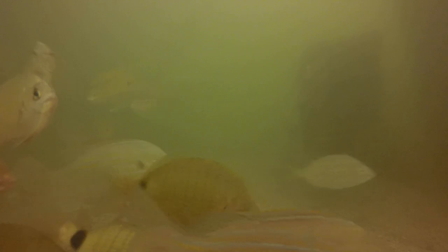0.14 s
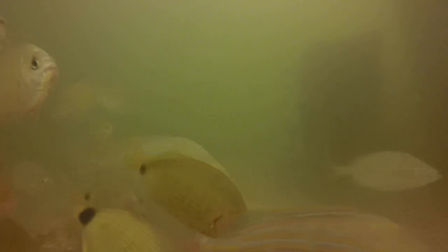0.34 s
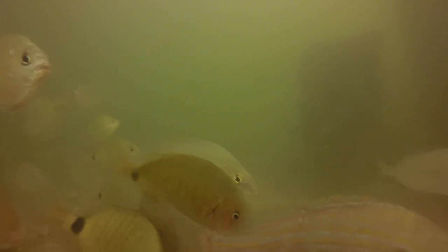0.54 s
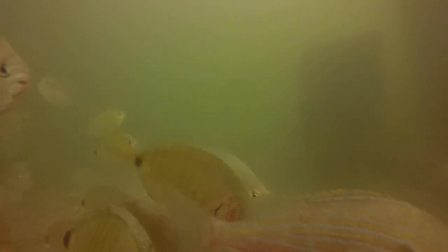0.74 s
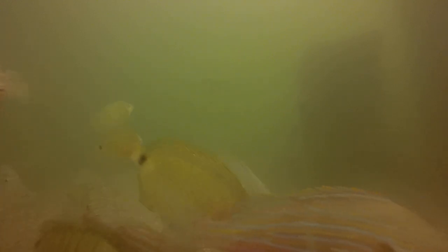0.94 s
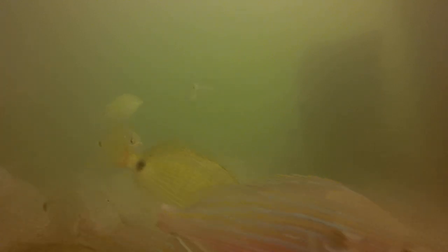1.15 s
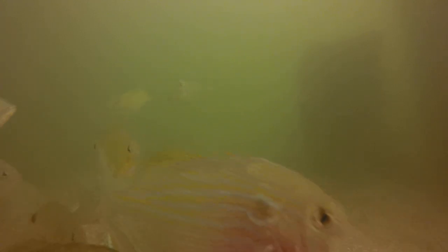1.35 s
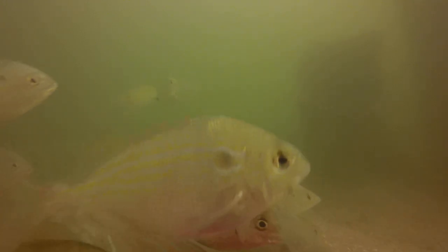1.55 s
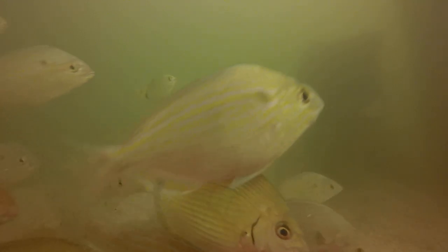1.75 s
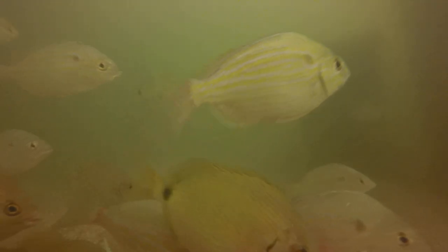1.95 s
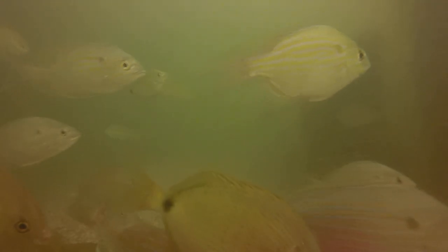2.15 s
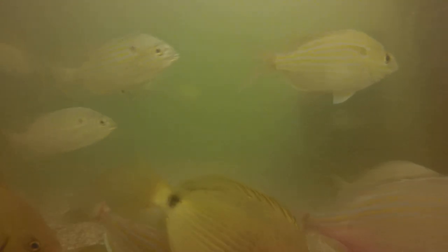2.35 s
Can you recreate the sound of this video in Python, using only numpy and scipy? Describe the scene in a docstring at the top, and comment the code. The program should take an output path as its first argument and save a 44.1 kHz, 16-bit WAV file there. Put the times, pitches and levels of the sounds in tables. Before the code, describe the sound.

Snapping shrimp crackle throughout, sharp nearby ticks over a dense fine distant crackle, thin and resonant inside a sealed underwater housing. Faint water rumbles below. Soft low thumps come early, strongest near 0.3 s, and a double-bump knock at 0.8 s. A deep hum near 50 Hz swells from 1 s, wavers until 1.8 s, then fades by 2 s. Small dull knocks surround it; one bubble blips at 2.2 s.

```python
"""Snapping shrimp beside a pier

Shallow water is heard from inside a sealed camera housing. Shrimp snaps are clicks and echoes that ring
the modes of the housing. A deep hum, a tone with half-order partials and noise, swells and fades over
the rumble of moving water, made of coloured noise, and a faint drone. Soft thumps are smooth pressure
pulses, one knock rings the modes of the mount, and dull small knocks and one bubble are short decaying
tones that rise slightly."""
import sys
import numpy as np
from scipy import signal
from scipy.fft import rfft, irfft
from scipy.io import wavfile

SR = 44100
rng = np.random.default_rng(int(sys.argv[2]) if len(sys.argv) > 2 else 0)


def transcribe(u):
    """Save the signal u as a 16-bit wav file named by the first command-line argument.

    u: samples, shape (n,) or (channels, n), limited to [-1, 1]; the rate is SR.
    q: integer samples, one column per channel.
    """
    v = np.clip(np.atleast_2d(u).T, -1, 1)
    q = np.round(v * 32767).astype(np.int16)
    wavfile.write(sys.argv[1], SR, q)


N = 105840
TIME = np.arange(N) / SR


def from_db(db):
    """Level: an amplitude ratio is ten to the power of a twentieth of its decibels."""
    return 10 ** (np.asarray(db) / 20)


def rms_one(x):
    """Normalisation: division by the root mean square leaves unit rms."""
    return x / np.sqrt(np.mean(x ** 2) + 1e-20)


def in_time(rows):
    """Linear interpolation: a (t/s, value) curve is read at every sample."""
    return np.interp(TIME, *np.transpose(rows))


def at_hz(points, hz):
    """Logarithmic frequency: (f/Hz, value) points are joined by lines on a log axis."""
    f, value = np.transpose(points)
    return np.interp(np.log(hz + 1e-6), np.log(f), value)


def band_pass(x, edges_hz):
    """Band limiting: a Butterworth filter keeps the range between two edges."""
    return signal.sosfilt(signal.butter(2, edges_hz, "band", fs=SR, output="sos"), x)


def noise(spectrum):
    """Spectral shaping: white noise is coloured, falls away outside the range, and is set to unit rms."""
    hz = np.arange(N // 2 + 1) * SR / N
    low_edge = hz ** 2 / (hz ** 2 + spectrum[0][0] ** 2 / 2)
    high_edge = 1 + (hz / (2 * spectrum[-1][0])) ** 2
    white = rfft(rng.standard_normal(N))
    return rms_one(irfft(white * from_db(at_hz(spectrum, hz)) * low_edge / high_edge, N))


def dying_noise(decay_s, size):
    """Reverberation: a dense cloud of echoes decays exponentially; unit energy."""
    cloud = rng.standard_normal(size) * np.exp(-np.arange(size) / (decay_s * SR))
    return cloud / np.linalg.norm(cloud)


def ring(force, hz, t60):
    """Damped resonator: a unit click starts a decaying sine of initial height about 1."""
    radius = from_db(-60 / (t60 * SR))
    angle = 2 * np.pi * hz / SR
    feedback = [1, -2 * radius * np.cos(angle), radius * radius]
    return signal.lfilter([0, np.sin(angle)], feedback, force + 1e-18)


def add(out, sound, s):
    """Superposition: a sound is added to the mix from a given time."""
    start = int(s * SR)
    out[start:start + len(sound)] += sound[:N - start]


# gain of the added favoured resonance, and its width
OWN_RING_DB, OWN_RING_WIDTH_HZ = 4.5, 350


def own_ring(x, hz):
    """Selective resonance: each direction of arrival favours one resonance."""
    peak = signal.iirpeak(hz, hz / OWN_RING_WIDTH_HZ, fs=SR)
    return x + from_db(OWN_RING_DB) * signal.lfilter(*peak, x)


# modes of the housing, before its band limit: f/Hz, level/dB, t60/s
HOUSING_MODES = [(1586, -7.5, 0.031), (1943, -6, 0.026), (2305, 3.5, 0.0071), (2770, -4.5, 0.015),
                 (2930, -9, 0.028), (3613, 0.5, 0.0089), (4270, -6.5, 0.0093), (5202, -2, 0.0081),
                 (6200, 1.5, 0.0027), (7500, 4.5, 0.0021), (10370, 5.5, 0.001), (13200, -9.5, 0.0049),
                 (790, -30, 0.041)]
SHELL_LEAK_DB = -16.5  # pressure change that passes straight through the shell
SHELL_BAND_HZ = (1500, 14400)


def housing(force, colour):
    """Modal superposition: pressure rings modes weighted by colour; little bass or top treble passes."""
    modes = np.zeros(len(force))
    for k, (hz, db, t60) in enumerate(HOUSING_MODES):
        sign = (-1) ** k
        modes += sign * from_db(db + at_hz(colour, hz)) * ring(force, hz, t60)
    direct = from_db(SHELL_LEAK_DB + colour[-1][1]) * np.diff(force, prepend=0)
    return band_pass(modes - direct, SHELL_BAND_HZ)


# near snaps: t/s, low, middle and high band level/dB (before SNAP_GAIN_DB),
# favoured resonance f/Hz, scattered sound against the direct click level/dB
NEAR_SNAPS = [(0.121,-44.5,-50.5,-56,2600,-8), (0.15,-41,-56,-57,2630,0), (0.2412,-45,-52,-55,3550,16),
              (0.2606,-37,-34,-44.5,3630,7), (0.2824,-63,-69,-52.5,7500,-9), (.4602,-51,-54,-46.5,3520,-5),
              (0.4985,-43,-49.5,-51,3380,-13), (0.6412,-45,-58,-53,2320,5), (0.6495,-41,-50,-66,3000,-14),
              (0.7,-46,-46.5,-48.5,3440,6), (0.7593,-42.5,-53,-40,3640,0), (0.8371,-52,-55,-56,2460,-10),
              (0.8763,-61,-45,-57,3490,-15), (.8866,-45.5,-46.5,-50,2680,-8), (0.9774,-52,-48,-64,2150,4),
              (0.9983,-35,-51,-54.5,2000,-25), (1.0253,-50,-44,-74,3720,-3),
              (1.1216,-40.5,-47,-50.5,2940,-2), (1.1433,-44.5,-45,-50.5,3440,-9),
              (1.1937,-34,-39,-46,2680,8), (1.26,-41,-47,-59,2300,-8), (1.3307,-68,-44,-54.5,3000,-16),
              (1.4064,-49,-69,-76,2536,1), (1.4906,-61,-47.5,-55,7600,6), (1.5633,-44,-46.5,-57,2550,8),
              (1.6218,-44,-46.5,-52.5,2300,23), (1.6538,-43.5,-44.5,-44.5,5270,17),
              (1.7267,-39.5,-55,-53,2570,-1), (1.748,-68,-48,-46.5,6560,-12),
              (1.7891,-42.5,-68,-53,2680,-3), (1.841,-43.5,-61,-74,2500,2), (1.8881,-48,-67,-70,2450,15),
              (1.9577,-51,-53,-70,3506,-5), (1.9892,-48,-45.5,-66,4320,-6), (2.0278,-50,-46,-52.5,2330,-4),
              (2.0684,-49,-47.5,-52,3730,3), (2.2956,-41.5,-42.5,-44,5100,-25),
              (2.3906,-49,-46,-49.5,3760,-1)]
# low, middle and high band of a snap: lower edge f/Hz, upper edge f/Hz
SNAP_BANDS = [(1600, 3100), (3100, 6300), (6300, 19000)]
SNAP_GAIN_DB, SCATTER_DECAY_S = 24, 0.0038
PIER_TAIL_DB, PIER_TAIL_DECAY_S = -6.5, 0.018  # level against the direct click
SURFACE_ECHO_MEAN_S, SURFACE_ECHO_DB = 0.003, -8  # level against the scatter


def near_snaps():
    """Impulse and reflection: a click, scatter from the bed, an inverted surface echo, a faint pier tail."""
    out = np.zeros(N)
    for s, *band_db, ring_hz, scatter_db in NEAR_SNAPS:
        scatter = from_db(scatter_db) * dying_noise(SCATTER_DECAY_S, size=2400)
        pier_tail = from_db(PIER_TAIL_DB) * dying_noise(PIER_TAIL_DECAY_S, size=2400)
        force = scatter + pier_tail
        force[0] += 1  # the direct click
        echo_at = int(SURFACE_ECHO_MEAN_S * rng.uniform(.8, 1.2) * SR)
        force[echo_at] -= from_db(SURFACE_ECHO_DB + scatter_db)
        snap = own_ring(housing(force, [(ring_hz, 0)]), ring_hz)  # one point: a flat colour
        for k, (edges_hz, db) in enumerate(zip(SNAP_BANDS, band_db)):
            part = band_pass(snap, edges_hz) * (-1) ** k
            add(out, from_db(SNAP_GAIN_DB + db) * part / np.linalg.norm(part), s)
    return out


# mean colour of the far snaps: f/Hz, level/dB
FAR_COLOUR = [(1600, -18), (2500, 7.5), (4000, -2.5), (8000, -8.5), (13000, -13.5)]
FAR_PER_S, FAR_DB = 380, -51.5  # rate over all directions, rms level of the whole crackle with its bunching
FAR_SPREAD_DB = 1  # scale of the exponential spread in size
FAR_UNLIKE_DB, FAR_CLUMP_DB = 8, 1.25  # rms colour differences by direction, rms bunching in time
FAR_SCATTER_SCALE_S = 0.0022  # multiplied by a random factor for each direction
FAR_RING_RANGE_HZ = (1990, 6500)  # favoured resonances


def far_snaps(count=12):
    """Random impulses: the colony crackles in bunches; each direction has its own colour and echo smear."""
    out = np.zeros(N)
    for _ in range(count):
        size_db = FAR_SPREAD_DB * np.minimum(rng.exponential(1, N), 4)
        sizes = from_db(size_db) * rng.choice([-1, 1], N)
        clicks = sizes * (rng.random(N) < FAR_PER_S / count / SR)
        decay_s = FAR_SCATTER_SCALE_S * rng.uniform(0.058, 2.94)
        smeared = signal.fftconvolve(clicks, dying_noise(decay_s, size=600))[:N]
        ring_hz = np.exp(rng.uniform(*np.log(FAR_RING_RANGE_HZ)))
        colour = [(hz, db + FAR_UNLIKE_DB * rng.standard_normal()) for hz, db in FAR_COLOUR]
        out += rms_one(housing(own_ring(smeared, ring_hz), colour))
    bunching = from_db(FAR_CLUMP_DB * noise([(10, 16.0), (25, -6.5)]))
    return from_db(FAR_DB) * rms_one(out * bunching)


# rms level of the hum's fundamental: t/s, level/dB
HUM_LEVEL = [(0, -55), (.6, -51), (.76, -43), (.89, -53.5), (.98, -38.5), (1.06, -32), (1.18, -29),
             (1.5, -33.5), (1.54, -38.5), (1.59, -30.5), (1.65, -28), (1.7, -36), (1.77, -34),
             (1.84, -53.5), (1.91, -40), (2.0, -59.5), (2.15, -70), (2.4, -67)]
# pitch of the hum: t/s, f/Hz
HUM_PITCH = [(0, 49.93), (.8, 53.98), (1.08, 54.4), (1.25, 52.3), (1.7, 51.34), (2.4, 50.4)]
# half-order partials: multiple of the pitch, level/dB against the fundamental
HUM_PARTIALS = [(.5, -29), (1.5, -19)]
# relative spectrum of the churning: f/Hz, level/dB per Hz
CHURN_SPECTRUM = [(15, -9), (27, -1), (45, -0.5), (60, -3.5), (78, 5), (95, -8.5), (125, -20), (250, -33)]
CHURN_OFFSET_DB, CHURN_FOLLOWS = -26, 0.48  # churning level/dB = offset + follows * hum level/dB


def hum():
    """Phase modulation: weak, wandering half-order partials make a deep tone flutter; churning follows it."""
    db = in_time(HUM_LEVEL)
    phase = 2 * np.pi * np.cumsum(in_time(HUM_PITCH)) / SR
    tone = np.sin(phase)
    for multiple, partial_db in HUM_PARTIALS:
        wander = noise([(1, -1), (6, -14)])  # 1 rad rms
        tone += from_db(partial_db) * np.sin(multiple * phase + wander)
    churning = from_db(CHURN_OFFSET_DB + CHURN_FOLLOWS * db) * noise(CHURN_SPECTRUM)
    return from_db(db) * np.sqrt(2) * tone + churning


# soft pushes of water on the housing: t/s, level/dB
THUMPS = [(0.244, -38.5), (0.3365, -23.5), (0.455, -39), (0.74, -42), (0.945, -31.5)]
THUMP_HZ, THUMP_WIDTH_S = 62.5, 0.0094
THUMP_RING_HZ, THUMP_RING_DB, THUMP_RING_T60_S = 78.3, -15.5, 0.61  # level against the push


def thump():
    """Forced and free vibration: a smooth push of about two slow cycles leaves a weak low ring."""
    out = np.zeros(N)
    for s, db in THUMPS:
        t = TIME - s
        age = np.maximum(t, 0)
        push = -np.exp(-.5 * (t / THUMP_WIDTH_S) ** 2) * np.sin(2 * np.pi * THUMP_HZ * t)
        decay = from_db(THUMP_RING_DB - 60 * age / THUMP_RING_T60_S)
        tail = decay * np.sin(2 * np.pi * THUMP_RING_HZ * age)
        out += from_db(db) * (push + tail)
    return out


# contacts of the knock: t/s, bump level/dB, scuff level/dB (before the scuff's band limit)
KNOCK_CONTACTS = [(.794, -0.5, 2), (.807, -9.5, 1)]
# modes of the mount: f/Hz, level/dB, t60/s
MOUNT_MODES = [(82.2, -31, .24), (163, -47, 0.12), (215.5, -41, 0.19), (446, -49.5, 0.019),
               (685, -43, 0.019), (765, -44, 0.039), (1480, -43.5, 0.011), (1810, -32.5, 0.0072)]
SCUFF_BAND_HZ, SCUFF_DECAY_S = (355, 1140), 0.0097


def knock():
    """Impact excitation: two quick bumps ring the mount; a light scuff roughens the middle modes."""
    bumps, scuff = np.zeros(N), np.zeros(N)
    for s, bump_db, scuff_db in KNOCK_CONTACTS:
        add(bumps, from_db([bump_db]), s)
        add(scuff, from_db(scuff_db) * dying_noise(SCUFF_DECAY_S, size=4000), s)
    force = bumps + band_pass(scuff, SCUFF_BAND_HZ)
    return sum(from_db(db) * ring(force, hz, t60) for hz, db, t60 in MOUNT_MODES)


# dull small knocks and, in the last row, one bubble: t/s, starting f/Hz, level/dB
SMALL_KNOCKS = [(.756, 715, -42), (.958, 439.6, -45.5), (1.652, 770, -45), (1.734, 780, -49),
                (1.791, 716, -45), (1.886, 513, -45), (2.220, 847, -40)]
SMALL_RISE_HZ_PER_S, SMALL_ATTACK_S, SMALL_T60_S = 730, .001, 0.081


def small_knocks():
    """Damped oscillation: dull small knocks and one bubble are short decaying tones that rise slightly."""
    out = np.zeros(N)
    age = TIME[:SR // 4]
    envelope = (1 - np.exp(-age / SMALL_ATTACK_S)) * from_db(-60 * age / SMALL_T60_S)
    for s, hz, db in SMALL_KNOCKS:
        cycles = (hz + .5 * SMALL_RISE_HZ_PER_S * age) * age  # integral of the rising pitch
        add(out, from_db(db) * envelope * np.sin(2 * np.pi * cycles), s)
    return out


# relative spectrum of open water: f/Hz, level/dB per Hz
WATER_SPECTRUM = [(20, 14), (60, -12.5), (120, -3.5), (220, -5), (330, -8.5), (450, -12), (600, -11.5),
                  (760, -7.5), (1050, -17), (1400, -18), (2400, -12.5), (4700, -20), (8000, -23.5),
                  (14000, -35.5)]
# rms level of open water: t/s, level/dB
WATER_LEVEL = [(0, -50), (.6, -52), (.8, -50.5), (1.1, -51.5), (1.7, -52), (2.4, -52.5)]
# rms level of the faint higher drone: t/s, level/dB
DRONE_LEVEL = [(0, -80), (.5, -59.5), (.78, -80), (.9, -56.5), (1.15, -59.5), (1.45, -71), (2.4, -80)]
DRONE_HZ, DRONE_WAVER_RAD = 274.5, .6  # centre frequency, rms phase wander


def background():
    """Broadband noise and a tone: the rush of open water with a faint, phase-modulated drone."""
    waver = DRONE_WAVER_RAD * noise([(2, 11), (20, -5)])
    tone = np.sqrt(2) * np.sin(2 * np.pi * DRONE_HZ * TIME + waver)
    drone = from_db(in_time(DRONE_LEVEL)) * tone
    return from_db(in_time(WATER_LEVEL)) * noise(WATER_SPECTRUM) + drone


def scene():
    """Linear superposition: all sounds add at the one microphone in the housing."""
    snaps = near_snaps() + far_snaps()
    return (snaps + hum() + thump() + knock() + small_knocks() + background())[None]


CUTOFF_HZ = 15800  # from here up the level is at least 60 dB down


def record(dry):
    """Low-pass filtering: a Chebyshev filter cuts the top steeply."""
    return signal.sosfilt(signal.cheby2(16, 60, CUTOFF_HZ, fs=SR, output="sos"), dry)


dry = scene()
out = record(dry)
transcribe(out)
```